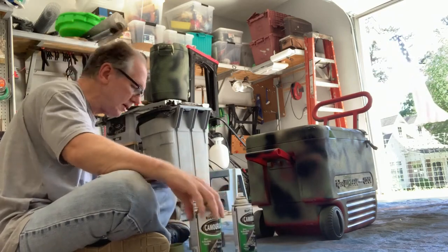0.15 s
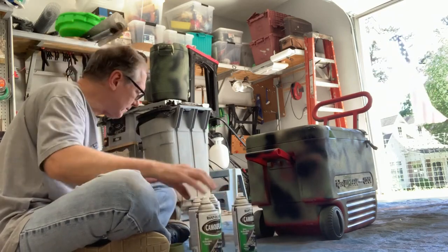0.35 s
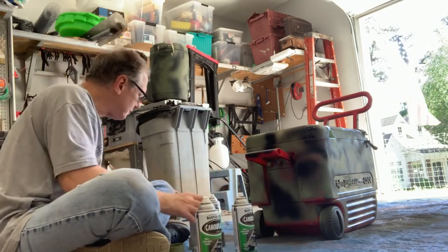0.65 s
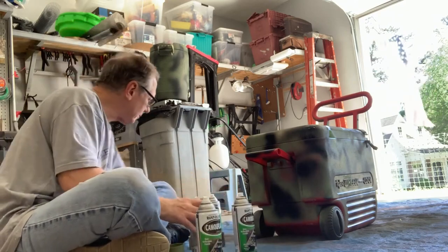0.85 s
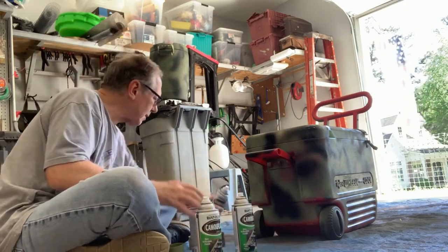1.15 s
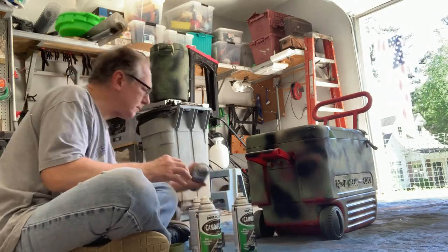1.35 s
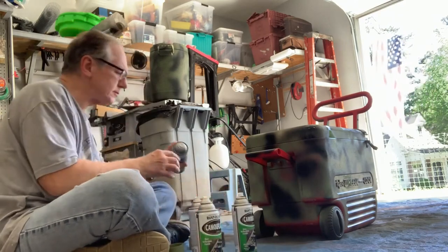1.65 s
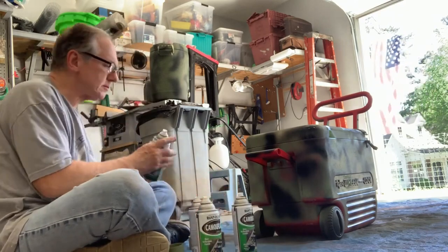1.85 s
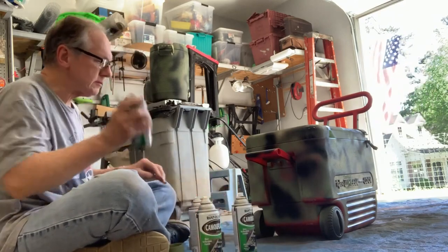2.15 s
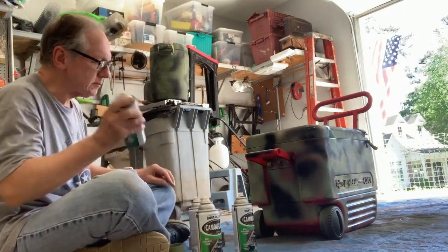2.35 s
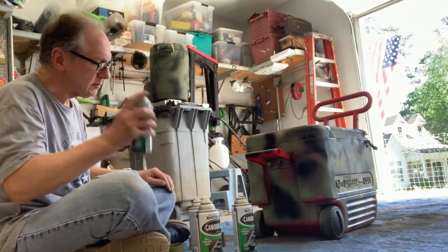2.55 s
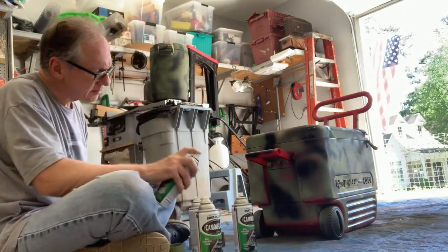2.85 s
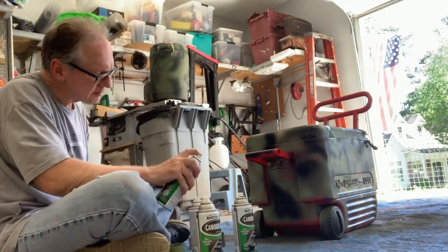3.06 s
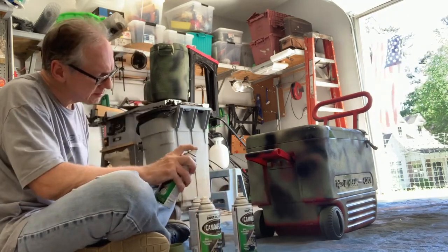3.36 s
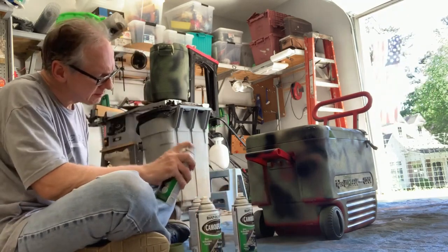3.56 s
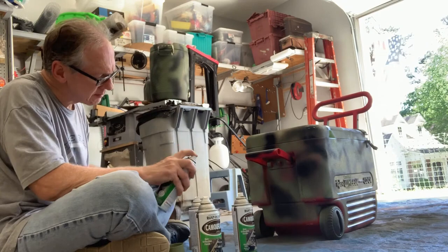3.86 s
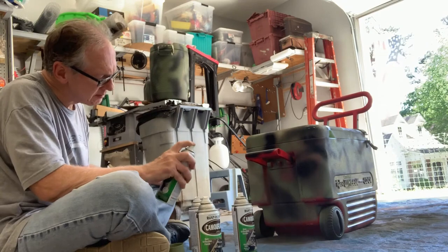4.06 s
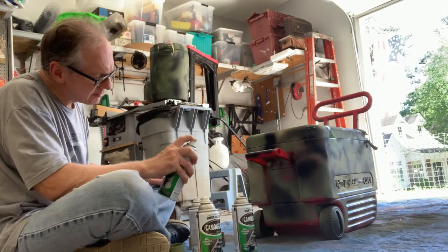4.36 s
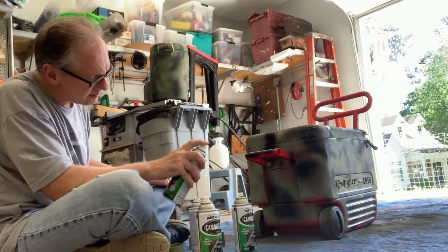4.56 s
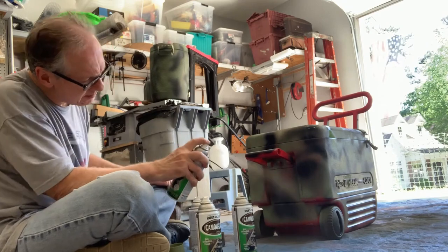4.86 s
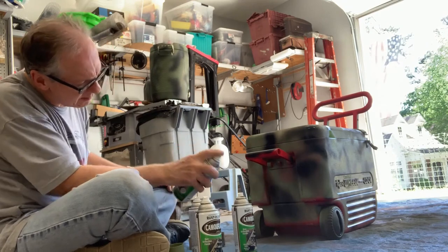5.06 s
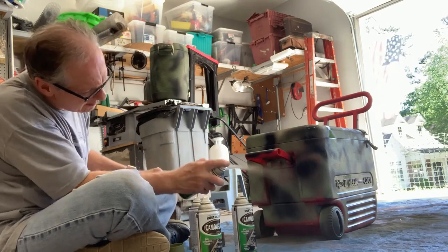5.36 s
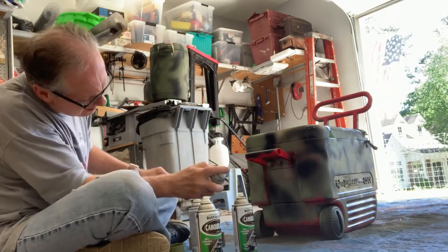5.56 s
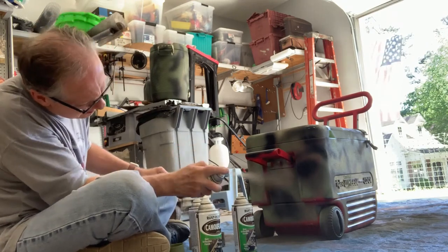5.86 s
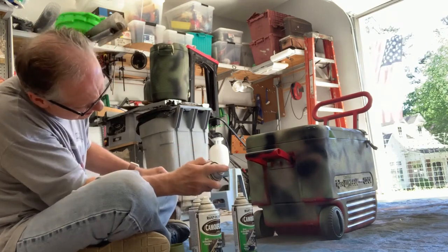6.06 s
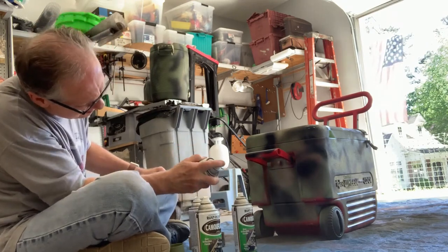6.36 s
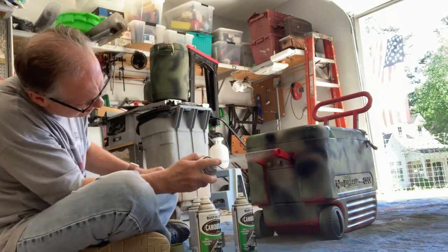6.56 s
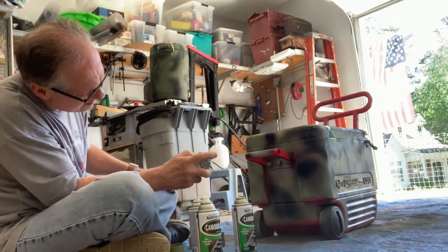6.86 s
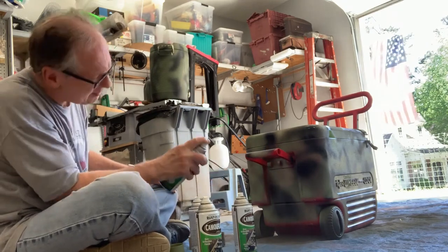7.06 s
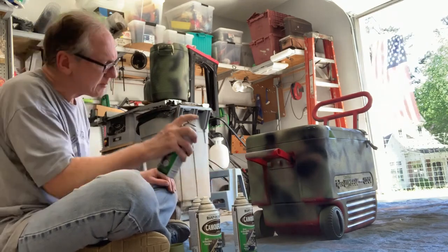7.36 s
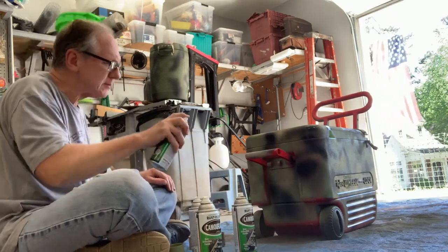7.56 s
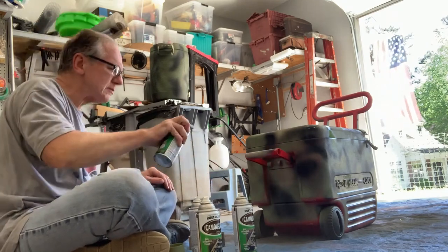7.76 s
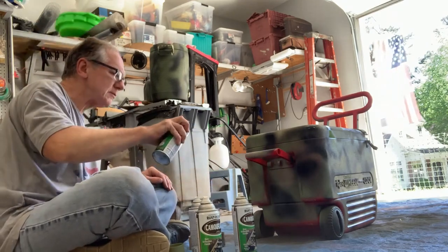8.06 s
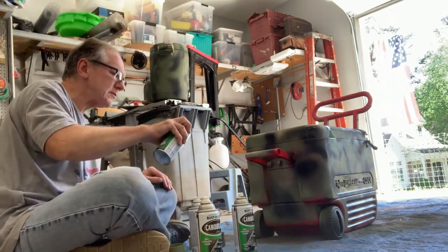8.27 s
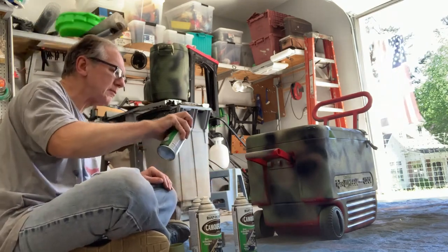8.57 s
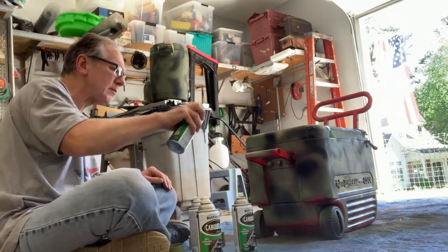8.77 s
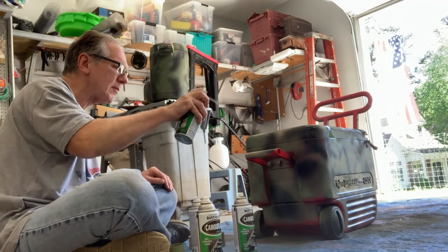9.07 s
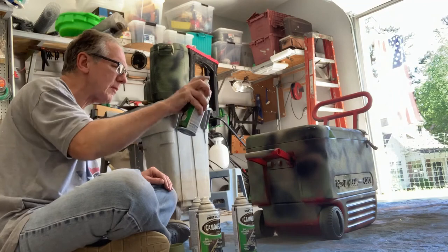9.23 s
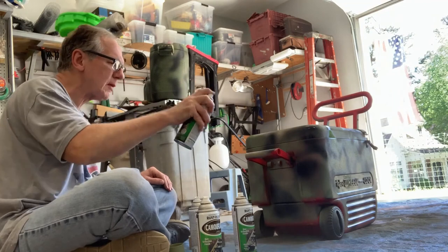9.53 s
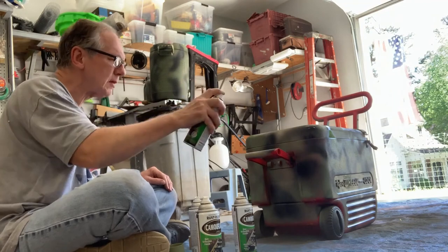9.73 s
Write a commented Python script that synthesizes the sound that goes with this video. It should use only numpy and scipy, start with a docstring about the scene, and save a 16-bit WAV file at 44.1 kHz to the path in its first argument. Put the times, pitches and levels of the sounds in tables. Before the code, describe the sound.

A metal can clunks onto a garage floor and rocks, another is shaken with a clacking ball, then sprayed in fifteen short hissing puffs.

```python
"""Spray can in a garage

A spray can lands on a garage floor and rocks on its rim; another is picked up and shaken, its mixing ball
clacking, then sprayed in fifteen puffs. Ball, landing and snaps are noise bursts with ringing modes; jet,
slosh, cloth and outdoor air are coloured noise. Far beyond the open door an engine, a stack of sine
orders, slowly sinks in pitch. Sounds from inside the garage take on its reflections."""
import sys
import numpy as np
from scipy import signal
from scipy.fft import rfft, irfft
from scipy.io import wavfile
from scipy.ndimage import uniform_filter1d

SR = 44100
rng = np.random.default_rng(int(sys.argv[2]) if len(sys.argv) > 2 else 0)


def inscribe(sig):
    """Save sig as 16-bit PCM at rate SR to the path in sys.argv[1].

    A 1-D sig is mono; a 2-D sig holds one channel per row.
    Samples are clipped to [-1, 1] before scaling.
    """
    pcm = np.round(np.clip(np.atleast_2d(sig).T, -1, 1) * 32767)
    wavfile.write(sys.argv[1], SR, pcm.astype(np.int16))


N = 436590
T = np.arange(N) / SR


def from_db(db):
    """Decibels to gain."""
    return 10 ** (np.asarray(db) / 20)


def rms_one(x):
    """Scale to unit rms."""
    return x / np.sqrt(np.mean(x ** 2) + 1e-20)


def in_time(rows):
    """Curve rows to one value per sample for each column after the time."""
    s, *columns = np.transpose(rows)
    return [np.interp(T, s, column) for column in columns]


def at_hz(points, hz):
    """Read a table on a log-frequency axis."""
    f, value = np.transpose(points)
    return np.interp(np.log(np.maximum(hz, 1)), np.log(f), value)


def colour(x, spectrum):
    """Causal (minimum-phase) filter with the given gains, built by folding the cepstrum."""
    size = 8192
    gain = from_db(at_hz(spectrum, np.fft.rfftfreq(size, 1 / SR)))
    cepstrum = irfft(np.log(gain))
    cepstrum[1:size // 2] *= 2
    cepstrum[size // 2 + 1:] = 0
    impulse = irfft(np.exp(rfft(cepstrum)))[:size // 2]
    return signal.oaconvolve(x, impulse)[:len(x)]


def drift(rate):
    """Random wander: straight lines between normal random knots, rate knots per second."""
    knots = rng.standard_normal(1000)
    return np.interp(T * rate, np.arange(len(knots)), knots)


def ring(x, hz, t60):
    """A mode: a unit click sets a dying sine of starting height 1 ringing."""
    r = from_db(-60 / (t60 * SR))
    w = 2 * np.pi * hz / SR
    return signal.lfilter([0, np.sin(w)], [1, -2 * r * np.cos(w), r * r], x + 1e-18)


def burst(t, decay_s):
    """A dying spurt of noise with an even spectrum and unit energy."""
    x = rng.standard_normal(len(t)) * np.exp(-t / decay_s)
    size = 2048
    power = uniform_filter1d(np.abs(rfft(x, size)) ** 2, size=9)
    evening = np.column_stack([np.fft.rfftfreq(size, 1 / SR), -10 * np.log10(power)])
    x = colour(x, evening[1:])
    return x / np.linalg.norm(x)


def high_pass(x, hz):
    """Gentle first-order low cut."""
    return signal.sosfilt(signal.butter(1, hz, "high", fs=SR, output="sos"), x)


def add(out, s, x):
    """Mix x into out from time s."""
    i = round(s * SR)
    out[..., i:i + x.shape[-1]] += x[..., :N - i]


# how long the garage rings in each band: (frequency [Hz], decay by 60 dB [s])
GARAGE_DECAY = [(150, 0.33), (500, 0.51), (1200, 0.3), (2800, 0.5), (5000, 0.53), (8000, 0.35),
                (12000, 0.11), (16000, 0.39)]
NEAR_S = 0.016  # decay constant of the first reflections, off floor and body


def garage(x, wet_db, aside_db, build_s, near=0, outward=None):
    """Direct sound plus reflections of what goes outward, thickening into a tail; returns sum, difference."""
    size = 32768
    t, hz = T[:size], np.fft.rfftfreq(size, 1 / SR)
    centres = np.array(GARAGE_DECAY)[:, 0]
    density = np.minimum(.2 + (t / .05) ** 2, 1)
    present = rng.random((2, size)) < density
    echoes = rng.standard_normal((2, size)) * present / np.sqrt(density) * (t > .002)
    spectrum = rfft(echoes)
    tail = np.zeros((2, size))
    for (centre, t60), share in zip(GARAGE_DECAY, np.eye(len(centres))):
        band = irfft(spectrum * np.interp(hz, centres, share))
        tail += band * np.exp(-np.log(1000) * t / t60)
    tail *= (1 - np.exp(-t / build_s)) * (1 + near * np.exp(-t / NEAR_S))
    tail *= from_db(wet_db) / np.linalg.norm(tail, axis=1, keepdims=True)
    # the first bounce arrives from aside, so the difference holds the slope of its wave
    aside = np.roll(np.gradient(x), 20)
    direct = np.array([x, from_db(aside_db) * aside])
    outward = x if outward is None else outward
    return direct + signal.oaconvolve(outward[None], tail, axes=1)[:, :len(x)]


# presses of the nozzle: (time [s], held [s], relative level [dB], opening [s],
# nozzle resonance offset [dB], sizzle [dB])
PUFF_PRESSES = [(3.131, 0.15, -38, 0.026, -4, 2.5), (3.589, 0.12, -36, 0.045, -4, 1.5),
                (3.972, 0.13, -38, 0.032, -1, 1.5), (4.343, 0.14, -38.5, 0.03, -3, 2.5),
                (4.856, 0.12, -37.5, 0.037, 0.5, 1), (5.364, 0.18, -38, 0.02, -9, 1.5),
                (5.865, 0.11, -35.5, 0.045, -6.5, 1), (6.141, 0.13, -36.5, 0.037, -3, 1),
                (6.595, 0.18, -36, 0.03, -13, 4.5), (7.185, 0.14, -38.5, 0.037, -0.5, 1),
                (7.808, 0.16, -38.5, 0.03, -7, 4), (8.227, 0.13, -40, 0.03, -2, 1.5),
                (8.705, 0.12, -40, 0.034, 2, -1.5), (9.024, 0.13, -38, 0.047, 3, 0.5),
                (9.659, 0.11, -36, 0.054, -1.5, 5.5)]
# hiss of the jet: (frequency [Hz], level [dB])
JET_HISS = [(300, -11), (800, -7), (1900, -9.5), (2500, -2.5), (3000, -6), (3600, -1.5), (5000, -6),
            (6600, -1), (8500, -0.5), (11000, 4.5), (13000, 4.5), (15200, -1), (17000, -7.5)]
NOZZLE_HZ, NOZZLE_T60_S, NOZZLE_DB = 2540, 0.0072, -13  # breathy resonance; each press offsets its level
SIZZLE_HZ = (11700, 14900)  # the sizzle sets in over this range
# a harder press is brighter: dB per octave of treble for each dB above the usual level
USUAL_PUFF_DB, BRIGHTER_PER_DB = -42.5, 0.19
# the jet also arrives off the hand and knee, which hollows its colour: range of delays, level
HAND_ECHO_S, HAND_ECHO_DB = (0.000513, 0.001572), -6.5
SPUTTER_PER_S, SPUTTER_DB = 89.5, 1.1


def spray(close_s, sag_db, aim_db):
    """The valve eases open, the jet hisses, sputters and sags, the valve shuts; each puff has new reflections."""
    out, t = np.zeros((2, N)), T[:SR * 3 // 4]
    jet_hz = np.array(JET_HISS)[:, 0]
    treble = np.log2(np.clip(jet_hz / 4000, 1, 3))
    top = np.interp(jet_hz, SIZZLE_HZ, [0, 1])
    for s, held, db, open_s, nozzle_db, sizzle_db in PUFF_PRESSES:
        lift_db = BRIGHTER_PER_DB * (db - USUAL_PUFF_DB) * treble + sizzle_db * top
        tone = [(hz, level + up + aim_db * rng.normal()) for (hz, level), up in zip(JET_HISS, lift_db)]
        hiss = colour(rng.standard_normal(len(t)), tone)
        echo = np.interp(t - rng.uniform(*HAND_ECHO_S), t, hiss)
        hiss = rms_one(hiss + from_db(HAND_ECHO_DB) * echo)
        breath = ring(rng.standard_normal(len(t)), NOZZLE_HZ, NOZZLE_T60_S)
        hiss += from_db(NOZZLE_DB + nozzle_db) * rms_one(np.gradient(breath))
        sputter = np.interp(t * SPUTTER_PER_S, np.arange(len(t)), rng.standard_normal(len(t)))
        opening = np.clip(t / open_s, 0, 1)
        closing = np.clip((held - t) / close_s + .5, 0, 1)
        level = from_db(db - sag_db * t / held + SPUTTER_DB * sputter)
        puff = level * opening * closing * hiss
        add(out, s, garage(puff, wet_db=-4.0, aside_db=-1.0, build_s=0.00037))
    return out


# mixing ball striking the can wall: (time [s], relative level [dB], dent pitch [Hz],
# cycles to the dent's peak [count], hard tick [dB])
BALL_STRIKES = [(1.7403, -25, 3200, 1.2, -4.5), (1.799, -33.5, 3400, 1, -5), (1.84, -40, 3190, 1.6, -1),
                (1.867, -44, 2960, 2.2, 2), (2.0604, -36.5, 4100, 0.93, -11.5),
                (2.1754, -33, 2820, 2.7, -26), (2.178, -33, 5000, 2.8, -29), (2.223, -28.5, 1960, 1.5, -3),
                (2.2805, 0, 3330, 1.5, -25), (2.344, -32, 1040, 1.3, -13), (2.3672, -15, 2170, 0.34, 0),
                (2.3786, -29, 1000, 0.97, -12), (2.39, -28, 1210, 0.43, -15),
                (2.415, -28.5, 1740, 1.2, -10), (2.4695, -5.5, 4560, 0.58, -4),
                (2.489, -31, 2200, 1.5, -12), (2.503, -28, 2980, 1, -8), (2.7129, -33.5, 2950, 2.2, -26),
                (2.88, -36, 1290, 1.3, -25), (2.892, -26, 1430, 0.88, 0), (3.001, -33.5, 1640, 0.68, -12),
                (3.001, -28, 5740, 2.6, -25), (3.032, -39, 1500, 0.67, -3),
                (3.0967, -30.5, 2090, 0.34, 3.5), (3.104, -30.5, 1480, 0.54, -7),
                (3.2064, -37, 1550, 2.1, -17), (3.221, -36, 1590, 1.6, -15.5),
                (3.281, -35, 1550, 0.91, -15), (3.3468, -38.5, 1600, 1.4, -1),
                (3.3728, -41, 1600, 0.81, -12), (3.396, -42, 1600, 1.3, -24)]
# shell of the can damped by the hand: (frequency [Hz], level [dB], decay by 60 dB [s])
HELD_SHELL = [(1040, -28, 0.026), (2000, -28.5, 0.01), (2530, -11.5, 0.009), (3008, -19, 0.048),
              (3550, -8.5, 0.0072), (4300, -17.5, 0.01), (5000, -15.5, 0.00566), (5630, -20, 0.008),
              (6400, -17, 0.005), (11350, -10.5, 0.0023), (14400, -13.5, 0.0031)]
# hard contact of the ball: (frequency [Hz], level [dB])
BALL_TICK = [(150, -14.5), (700, -13), (1500, -1), (3000, 0), (6000, 1.5), (9000, 1.5), (16000, -7)]
DENT_OVERTONE, DENT_OVERTONE_DB = 1.8, -11.5  # second mode of a dent: multiple of its pitch, level
REBOUND_S, REBOUND_DB = 0.0024, -11  # the ball touches once more, 0.65 to 1.1 times this long after
WALL_CUT_HZ = 570  # the small can radiates little below this


def ball(dent_db, shell_db, tick_db, tick_s, grip):
    """The ball dents the wall in a pitched swell, rings the shell, which grip and paint detune, and rebounds."""
    out, t = np.zeros(N), T[:SR // 10]
    for s, db, hz, cycles, hard_db in BALL_STRIKES:
        overtone = from_db(DENT_OVERTONE_DB) * np.sin(2 * np.pi * hz * DENT_OVERTONE * t)
        dent = np.sin(2 * np.pi * hz * t) + overtone
        age = t * hz / cycles
        dent *= age * np.exp(1 - age) / np.sqrt(2 * cycles)
        shell = np.zeros(len(t))
        for f, level, t60 in HELD_SHELL:
            gain = from_db(level + rng.normal(0, 2.4)) * rng.choice([-1, 1])
            shell += gain * ring(t == 0, f * np.exp(grip * rng.normal()), t60)
        tick = from_db(hard_db + tick_db) * colour(burst(t, tick_s), BALL_TICK)
        strike = from_db(db) * (from_db(dent_db) * dent + from_db(shell_db) * shell + tick)
        add(out, s, strike)
        add(out, s + REBOUND_S * rng.uniform(0.65, 1.1), from_db(REBOUND_DB) * strike)
    return high_pass(out, WALL_CUT_HZ)


# a swing of the can throws the paint against its wall: (time [s], level [dB], settling time constant [s])
PAINT_SWINGS = [(1.735, -60, 0.24), (2.17, -57.5, 0.32), (2.273, -39.5, 0.064), (2.359, -41.5, 0.11),
                (2.471, -40, 0.041), (3.17, -51.5, 0.092)]
# colour of the slapping paint and skittering ball: (frequency [Hz], level [dB])
SLOSH_COLOUR = [(150, -11.5), (350, -3), (600, -10), (1100, 1), (1500, 0), (2400, 2.5), (3200, -0.5),
                (5000, -6), (8000, -13.5), (16000, -17.5)]
SWING_RISE_S = 0.027


def jostle(per_s, spread_db):
    """After each swing paint slaps and the ball skitters in a dying spatter of small contacts."""
    level, t = np.zeros(N), T[:SR]
    for s, db, settle_s in PAINT_SWINGS:
        add(level, s, from_db(db) * np.minimum(t / SWING_RISE_S, 1) * np.exp(-t / settle_s))
    hits = (rng.random(N) < per_s / SR) * rng.choice([-1, 1], N)
    contacts = hits * from_db(spread_db * rng.standard_normal(N))
    return level * rms_one(colour(contacts, SLOSH_COLOUR))


# can set down, then rocking on its rim: (time [s], relative level [dB], contact hardness [Hz],
# floor thud [dB], rim ping [dB])
RIM_TOUCHES = [(0.1274, -0.5, 6400, 1.5, -24), (0.143, -25, 4000, -6, -13),
               (0.1482, -10.5, 12000, -7.5, -3.5), (0.2072, -14.5, 11000, -12, -14),
               (0.2547, -17, 7050, -2.5, -22), (0.2962, -31, 5000, -20, 1), (0.313, -16, 400, -13, -29),
               (0.3529, -25, 6000, -18, -1.5), (0.398, -9, 300, -13, -27), (0.544, -25, 250, -10, -27)]
# ring of the standing can, in close clusters: (frequency [Hz], level [dB], decay by 60 dB [s])
STANDING_RING = [(747, -34, 0.2), (826, -34.5, .3), (875, -39.5, .36), (1053, -26.5, 0.83),
                 (1066, -26.5, 0.75), (1324, -18, 0.025), (1618, -27.5, 0.12), (1635, -24.5, 0.14),
                 (2240, -38, 0.299), (2320, -34.5, 0.32), (2386, -33, 0.14), (2480, -37, .2),
                 (2723, -44, .3), (3160, -41.5, 0.32), (3580, -43, 0.38), (4220, -30.5, 0.24),
                 (4207, -29.5, 0.33), (4260, -27.5, 0.2), (4298, 4, 0.011), (4434, -36, 0.25),
                 (4580, -36, .2), (5140, -40, .35), (6460, -41, 0.44), (6670, -39.5, 0.4)]
# dead crack of steel on the floor, before each touch's thud is added: (frequency [Hz], level [dB])
FLOOR_CRACK = [(60, -29), (150, -2.5), (300, -2), (500, -6), (800, 0), (1550, 2.5), (2000, -12),
               (3300, -14), (5200, -14.5), (5700, -21), (6600, -15.5), (8000, -18), (14000, -15.5),
               (17000, -26.5)]
PING_HZ, PING_T60_S = 5110, 0.0045  # the rim itself, when it lands on its edge
THUD_TOP_HZ = (1600, 3300)  # the floor's thud fades out over this range
ROCK_PER_S, ROCK_DB, ROCK_ONSET_S = 22, 3.5, .15  # flutter as the can rocks: mean rate, depth, time to set in
STILLED_S, STILLING_S = 0.57, .045  # the can comes to rest at this time; decay constant of its sound


def set_down(crack_db, ring_db, crack_s):
    """Each touch of the rim cracks on the floor and rings the can, softer contacts duller; crack and ring."""
    out, t = np.zeros((2, N)), T[:SR * 3 // 4]
    modes = sum(from_db(level) * ring(t == 0, hz, t60) for hz, level, t60 in STANDING_RING)
    modes = modes * (1 - np.exp(-t / 0.002))
    ping = ring(t == 0, PING_HZ, PING_T60_S)
    for s, db, hard_hz, thud_db, ping_db in RIM_TOUCHES:
        tone = [(hz, level + thud_db * np.interp(hz, THUD_TOP_HZ, [1, 0])) for hz, level in FLOOR_CRACK]
        # the softest contacts hardly crack at all
        crack_gain = from_db(crack_db) * min(hard_hz / 4000, 1)
        crack = crack_gain * colour(burst(t, crack_s), tone)
        ringing = from_db(ring_db) * (modes + from_db(ping_db) * ping)
        softness = signal.butter(1, min(hard_hz, 20000), fs=SR, output="sos")
        add(out, s, from_db(db) * signal.sosfilt(softness, np.array([crack, ringing])))
    onset = np.clip((T - RIM_TOUCHES[0][0]) / ROCK_ONSET_S, 0, 1)
    rocking = np.sin(2 * np.pi * ROCK_PER_S * T + 2 * drift(6.6)) * onset
    stilling = np.exp(-np.maximum(T - STILLED_S, 0) / STILLING_S)
    return out * from_db(ROCK_DB * rocking) * stilling


# one mode sinks in pitch, perhaps as the paint surges in the landed can
SAG_HZ, SAG_HZ_PER_S, SAG_DB, SAG_PEAK_S = 1770, 2500, -30, .025


def sinking_ring():
    """From the landing one mode swells briefly and slides down in pitch."""
    out, t = np.zeros(N), T[:SR // 3]
    age = t / SAG_PEAK_S
    tone = np.sin(2 * np.pi * (SAG_HZ * t - SAG_HZ_PER_S * t ** 2 / 2))
    add(out, RIM_TOUCHES[0][0], from_db(SAG_DB) * age * np.exp(1 - age) * tone)
    return out


# small snaps as the can is turned in the hand: (time [s], relative level [dB],
# brightness [dB per octave], ring pitch [Hz], relative ring level [dB])
HAND_SNAPS = [(6.2847, -26, 3, 2830, -4), (6.4796, -28, 1, 2850, -4), (6.614, -27, 5, 3530, -8),
              (6.8252, -18, 3.5, 2870, -2), (6.865, -31, -5, 2270, 0), (7.0499, -18.5, 1.5, 4110, -4),
              (7.141, -27.5, 3.5, 4280, -9), (7.169, -30, 3, 6800, -8)]
# colour of a snap, before its own brightness: (frequency [Hz], level [dB])
SNAP_COLOUR = [(200, -27), (900, -4), (1800, 3.5), (2300, 8), (2900, 8.5), (4300, 5.5), (5400, -11),
               (6800, 1.5), (8000, -7), (12000, -6.5), (16000, -19.5)]
SNAP_T60_S = 0.0048  # ring of the cap after a snap


def clicks(level_db, snap_s, cap_db):
    """Dry snaps as the can is turned in the hand, each a noise burst with a short ring of the cap."""
    out, t = np.zeros(N), T[:SR // 10]
    for s, db, tilt, ring_hz, ring_db in HAND_SNAPS:
        tone = [(hz, level + tilt * np.log2(hz / 4000)) for hz, level in SNAP_COLOUR]
        snap = colour(burst(t, snap_s), tone)
        cap = ring(t == 0, ring_hz, SNAP_T60_S) * (1 - np.exp(-t / snap_s))
        cap = from_db(cap_db + ring_db) * cap / np.linalg.norm(cap)
        add(out, s, from_db(db + level_db) * (snap + cap))
    return out


# a can is nudged and dragged before it is lifted: (time [s], length [s], level [dB])
CAN_SLIDES = [(0.537, 0.11, -68), (0.868, 0.033, -69.5), (1.126, 0.025, -62.5), (1.37, 0.21, -67.5),
              (1.649, 0.027, -63.5)]
# colour of its scraped wall: (frequency [Hz], level [dB])
SCRAPE_COLOUR = [(300, -5.5), (1100, 1), (1750, 8.5), (2500, 2.5), (3400, -2), (3900, -6), (4300, 0),
                 (4900, -11), (5800, -12), (6500, -28), (16000, -26)]


def slides(grain_db, edge_s):
    """A can drags in small catches that stir its wall: coloured noise with a flickering level."""
    level = np.zeros(N)
    for s, length, db in CAN_SLIDES:
        start = np.clip((T - s) / edge_s, 0, 1)
        stop = np.clip((s + length - T) / edge_s + 1, 0, 1)
        level += from_db(db) * start * stop
    return level * from_db(grain_db * drift(120)) * rms_one(colour(rng.standard_normal(N), SCRAPE_COLOUR))


# the arm moves and the sleeve rubs: (time [s], length [s], peak level [dB])
SLEEVE_RUBS = [(0.48, 0.22, -63.5), (1.14, 0.17, -70.5), (2.6, 0.79, -63.5), (5.396, 0.56, -73.5),
               (6.4, 1.0, -65), (8.945, 0.64, -76)]
# colour of rubbing cloth: (frequency [Hz], level [dB])
CLOTH_COLOUR = [(300, -5), (1000, 2), (2000, 5.5), (2900, 2.5), (4500, -4.5), (6500, -12), (9000, -16),
                (16000, -24)]
RUB_RISE = 0.4  # share of a rub spent swelling
# the cloth stirs faintly between these times while the can is handled, less at rest
HANDLING_S, HANDLING_DB, RESTING_DB = (1.716, 6.7), -76, -81.5


def sleeve(grain_db):
    """Cloth rubs in small uneven catches; each move of the arm swells and fades over a faint stir."""
    handled = (T > HANDLING_S[0]) & (T < HANDLING_S[1])
    stir = np.where(handled, from_db(HANDLING_DB), from_db(RESTING_DB))
    level = uniform_filter1d(stir, size=SR // 4)
    for s, length, db in SLEEVE_RUBS:
        rub = np.interp(T, [s, s + length * RUB_RISE, s + length], [0, 1, 0])
        level = np.maximum(level, from_db(db) * rub)
    return level * from_db(grain_db * drift(50)) * rms_one(colour(rng.standard_normal(N), CLOTH_COLOUR))


# far engine, slowly sinking: (time [s], speed [cycles per s])
SINKING_SPEED = [(0, 20.68), (4, 19.63), (6, 19.2), (9.9, 18.74)]
# main hum, the fifth order, before HUM_DB: (time [s], level [dB])
HUM_LEVEL = [(0.0, -48), (0.33, -46), (1.21, -52.5), (2.98, -46.5), (3.75, -49), (3.95, -57), (4.66, -50),
             (5.4, -65.5), (9.21, -56), (9.9, -58)]
# ninth order: (time [s], level [dB])
NINTH_ORDER = [(0, -49), (1.15, -51), (1.4, -60.5), (1.9, -55.5), (2.2, -54.5), (3.05, -53.5), (3.3, -61),
               (4, -66), (6, -66.5), (7, -62), (7.9, -62.5), (9.9, -58.5)]
# shared level of the upper orders: (time [s], level [dB])
UPPER_ORDERS_LEVEL = [(0, -51), (.7, -46.5), (1.4, -57), (3, -57), (4.2, -69.5), (6, -56.5), (9.9, -61.5)]
# balance of these orders: (multiple of the speed [count], relative level [dB])
UPPER_ORDERS = [(3, -16.5), (7, -16), (8, -15), (10, -13), (11, -11.5), (12, -9), (13, -12.5), (14, -4.5),
                (15, -11), (16, -10), (17, -25)]
# swells out of the drone, heard only for orders that are played:
# (multiple of the speed [count], time [s], length [s], peak level [dB])
DRONE_SWELLS = [(6, 1.3, .5, -55), (16, 1.06, .45, -58.5), (10, 2.2, 1.1, -53.5), (15, 2.56, 1.63, -59.5),
                (4, 2.67, 1.9, -50.5), (12, 3.6, 0.76, -61)]
HUM_DB = 2.5
FOURTH_DB, FOURTH_RISE_S = -53.5, 1.6  # the fourth order swells in and stays: mean level, time constant


def engine(fade_db, fourth_fade_db, wobble):
    """Sine orders of the engine cycle, fading and wavering on their long way through the air."""
    speed, = in_time(SINKING_SPEED)
    hum_db, = in_time(HUM_LEVEL)
    ninth_db, = in_time(NINTH_ORDER)
    upper_db, = in_time(UPPER_ORDERS_LEVEL)
    phase = 2 * np.pi * np.cumsum(speed) / SR
    fourth = from_db(FOURTH_DB + fourth_fade_db * drift(2.5)) * (1 - np.exp(-T / FOURTH_RISE_S))
    orders = [(4, fourth), (5, from_db(HUM_DB + hum_db)), (9, from_db(ninth_db))]
    orders += [(k, from_db(upper_db + db + fade_db * drift(1.9))) for k, db in UPPER_ORDERS]
    swells = {}
    for k, s, length, db in DRONE_SWELLS:
        swells[k] = from_db(db) * np.sin(np.pi * np.clip((T - s) / length, 0, 1))
    drone = np.zeros(N)
    for k, gain in orders:
        wave = np.sin(k * (phase + wobble * drift(5)) + rng.uniform(0, 2 * np.pi))
        drone += np.maximum(gain, swells.get(k, 0)) * wave
    return np.sqrt(2) * drone


# a faint rising hum from the street: (time [s], frequency [Hz], level [dB])
STREET_TONE = [(8.8, 368, -93), (9.25, 378.3, -70), (9.7, 392.5, -60.5), (9.9, 394, -75.5)]


def street_hum(waver):
    """One far tone, a sine with an unsteady phase."""
    hz, db = in_time(STREET_TONE)
    phase = 2 * np.pi * np.cumsum(hz) / SR + waver * drift(30)
    return np.sqrt(2) * from_db(db) * np.sin(phase)


# outdoor rumble and hiss: (frequency [Hz], level [dB])
AIR_COLOUR = [(20, -15), (40, -6.5), (58, 1), (80, 5), (130, -2.5), (220, -1.5), (310, -6), (400, -14),
              (700, -17.5), (1200, -24.5), (2500, -37.5), (5000, -50.5), (9000, -50), (16000, -50)]


def air(level_db):
    """Steady, diffuse outdoor rumble, unrelated in sum and difference."""
    sides = [rms_one(colour(rng.standard_normal(N), AIR_COLOUR)) for _ in range(2)]
    return from_db(level_db) * np.array(sides)


# microphone pair, whose sum cancels near 9 kHz: (frequency [Hz], level [dB])
PAIR_SUM = [(100, -3), (6500, 1), (8000, -2), (9000, -24), (10000, -2), (11500, -0.5), (16000, -0.5)]
# their difference, strong near there: (frequency [Hz], level [dB])
PAIR_DIFFERENCE = [(60, -9.5), (150, -11), (300, -3.5), (700, 1), (2000, 0.5), (4500, 0.5), (7000, 3.5),
                   (8200, 7.5), (9000, 4), (10800, 5), (12000, -4.5), (14000, -13.5), (15400, -5.5)]
# the left port is slightly duller in the middle: (frequency [Hz], level [dB])
LEFT_COLOUR = [(100, 0.5), (250, -1.5), (600, -3.5), (1200, -3), (2500, -1), (5000, -.5), (12000, -0.5)]


def scene():
    """All sources as sum and difference, through the microphone pair, to left and right."""
    pair = spray(close_s=0.098, sag_db=7.0, aim_db=0.1) * from_db(-1)

    rattle = ball(dent_db=-0.5, shell_db=-5.5, tick_db=6, tick_s=0.00082, grip=0.041)
    # the room hears more of the whole shell
    all_round = ball(dent_db=-4.5, shell_db=-1.5, tick_db=7, tick_s=.0007, grip=0.043)
    pair += garage(rattle, wet_db=-4.5, aside_db=-10.5, build_s=0.00072, near=1.7, outward=all_round)

    crack, ringing = set_down(crack_db=21, ring_db=-3.5, crack_s=0.0023)
    pair += garage(crack, wet_db=-4.0, aside_db=-8.5, build_s=0.003)
    pair += garage(ringing + sinking_ring(), wet_db=-5.0, aside_db=-9.0, build_s=0.003)

    snaps = clicks(level_db=1.5, snap_s=0.0013, cap_db=1.5)
    # the hand shields the cap's ring from the room
    snaps_outward = clicks(level_db=2.5, snap_s=0.0012, cap_db=-9)
    pair += garage(snaps, wet_db=-3.0, aside_db=-1, build_s=0.0016, near=0.83, outward=snaps_outward)

    rustle = sleeve(grain_db=3.5) + slides(grain_db=1.5, edge_s=0.01) + jostle(per_s=700, spread_db=5.5)
    pair += garage(rustle, wet_db=-2.0, aside_db=-9.5, build_s=0.0064)

    # the far tones arrive from straight ahead, in the sum alone
    pair[0] += engine(fade_db=3.0, fourth_fade_db=2.5, wobble=0.069) + street_hum(waver=.7)
    pair += air(level_db=-51.5)
    mid, side = colour(pair[0], PAIR_SUM), colour(pair[1], PAIR_DIFFERENCE)
    return np.array([colour(mid + side, LEFT_COLOUR), mid - side])


CUTOFF_HZ = 15750


def record(dry):
    """The top is cut steeply by an elliptic low-pass."""
    return signal.sosfilt(signal.ellip(12, .1, 80, CUTOFF_HZ, fs=SR, output="sos"), dry)


dry = scene()
out = record(dry)
inscribe(out)
```